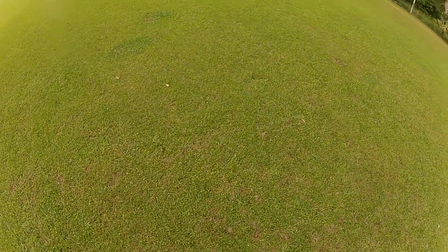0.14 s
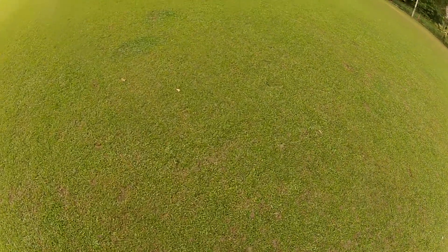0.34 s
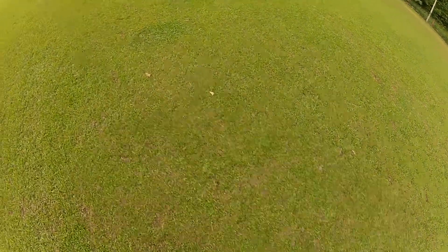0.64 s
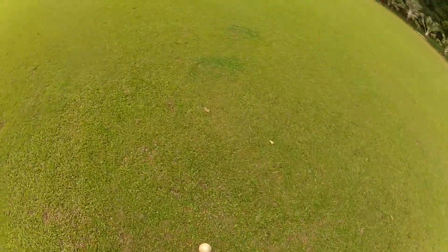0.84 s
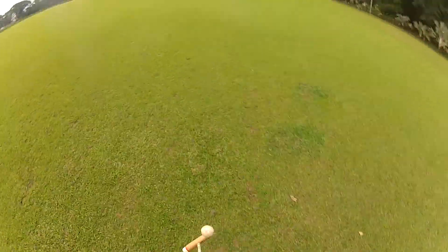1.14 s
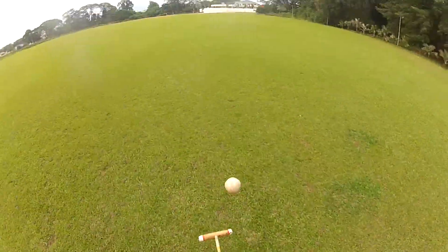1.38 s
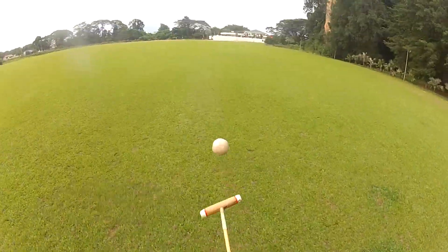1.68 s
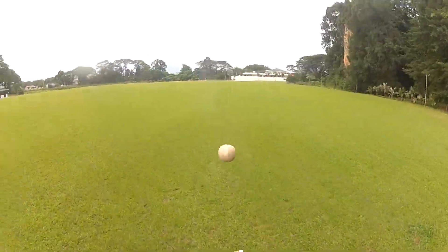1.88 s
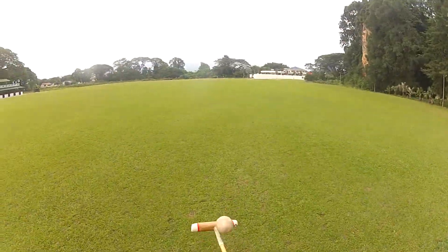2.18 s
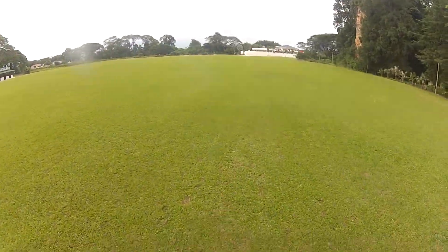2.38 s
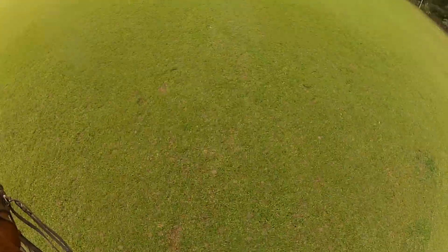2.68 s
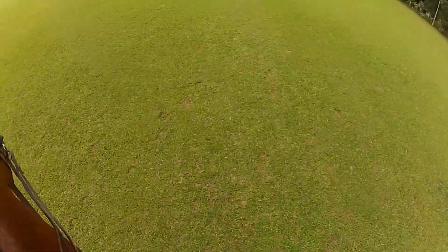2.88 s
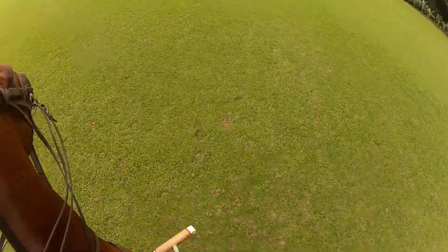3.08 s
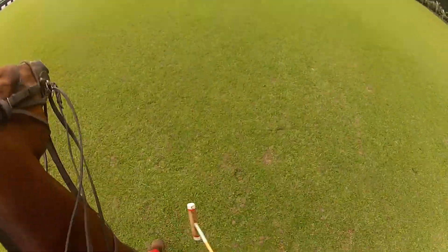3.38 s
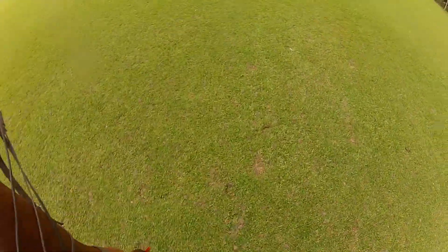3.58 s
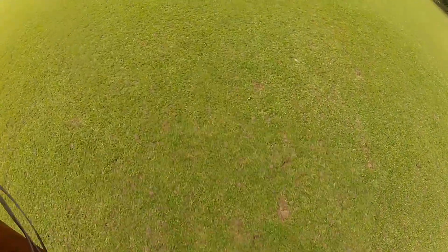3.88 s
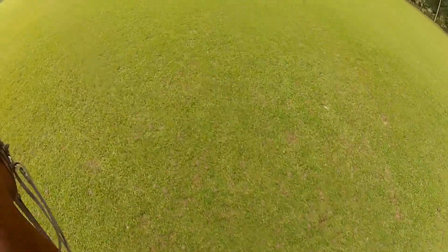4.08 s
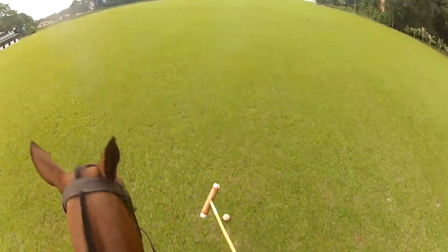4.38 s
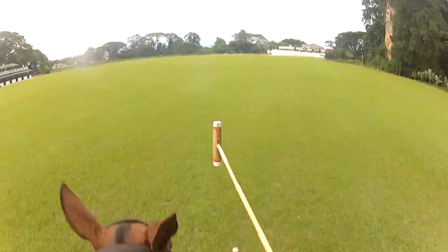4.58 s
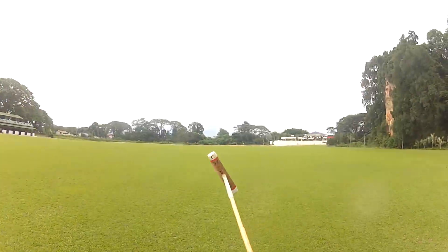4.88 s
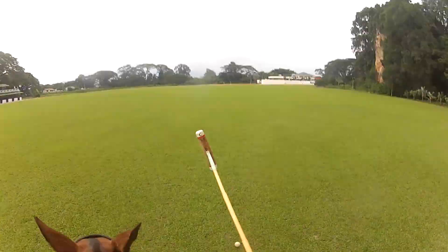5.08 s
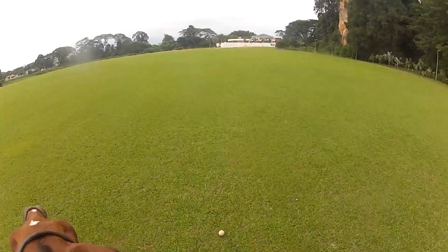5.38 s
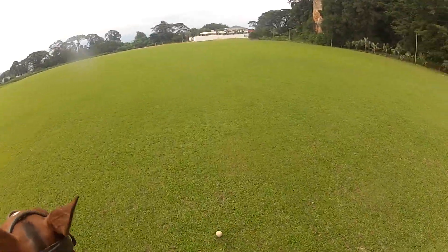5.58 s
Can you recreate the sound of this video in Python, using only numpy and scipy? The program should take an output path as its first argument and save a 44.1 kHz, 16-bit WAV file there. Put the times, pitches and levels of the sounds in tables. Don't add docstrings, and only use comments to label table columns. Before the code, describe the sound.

Mono sound from a sealed camera on a rider's helmet, on an open grass field with little reverberation. A low wind rumble and a faint, wavering far engine hum around 90 Hz lie underneath. Loud, dry mallet-on-ball cracks come at about 0.85, 1.2, 1.6, 2.2, 2.7 and 3.1 seconds; those at 1.2 and 3.1 are hardest, the one at 2.2 softer and duller. Each has a clipped click, short woody ring and quick return off the ground. Between them, straps creak, tick and slip in little rattling runs, the shell knocks hollowly, and hooves thud softly. Around 4.05 a weaker blow arrives amid crackling turf scrapes and bumps, followed by busy ticks and knocks until 4.6. A small clack comes at 5.3. From about 4.8 wind rises steadily into strong, deep buffeting at the end, about 5.7. The tone is muffled with a gritty, mirrored digital treble.

```python
import sys
import numpy as np
from scipy import signal
from scipy.fft import rfft, irfft, next_fast_len
from scipy.io import wavfile
from scipy.ndimage import map_coordinates

SR = 44100
rng = np.random.default_rng(int(sys.argv[2]) if len(sys.argv) > 2 else 0)


def nominal_scale(level):
    x = np.asarray(level, float) / 20
    return 10 ** x


def wav_record(signal):
    frames = np.transpose(np.atleast_2d(signal))
    bounded = np.clip(frames, -1, 1)
    quanta = np.round(bounded * 32767).astype(np.int16)
    wavfile.write(sys.argv[1], SR, quanta)


N = 253134

# (time [s], level [dB])
WIND_STRENGTH = [(0.0, -51), (0.14, -55.5), (0.7, -55), (1.01, -44.5), (1.12, -58), (1.32, -51.5),
                 (2.01, -43.5), (2.21, -40.5), (2.48, -53.5), (3.29, -47.5), (3.45, -56.5), (3.68, -55),
                 (3.97, -48), (4.36, -51.5), (4.87, -42), (5.07, -35), (5.45, -28), (5.74, -26.5)]
# (start [s], length [s], gap [ms], slip level [dB], pitch [Hz])
STRAP_RUNS = [(0.0, 0.064, 15, -43, 3150), (0.403, .09, 11.5, -41, 2660), (0.531, 0.066, 17, -57, 2280),
              (0.667, 0.068, 33, -43.5, 2400), (0.809, 0.05, 20, -39, 2930), (1.048, 0.035, 6.1, -40, 3340),
              (1.273, .13, 30, -54, 2380), (1.425, 0.21, 18.5, -40.5, 2130), (1.803, 0.14, 22, -47.5, 2800),
              (2.019, 0.07, 30, -51, 3500), (2.114, .07, 35, -40, 2800), (2.41, 0.174, 12, -39, 4660),
              (2.919, 0.11, 16, -50.5, 3100), (3.185, 0.057, 22, -64, 2600), (3.349, 0.14, 21, -49, 2270),
              (3.803, 0.066, 18, -48, 2170), (3.999, .045, 9.7, -36, 3820), (4.09, 0.034, 22, -40, 2610),
              (4.271, 0.055, 17, -41, 2740), (4.438, 0.32, 24, -41.5, 2800), (4.942, .11, 31, -50, 2300),
              (5.169, 0.085, 14.7, -40, 3370), (5.658, .08, 27, -54, 1920)]


def unit(x):
    return x / np.sqrt(np.mean(x ** 2) + 1e-20)


def along(points, hz):
    f, v = np.transpose(points)
    return np.interp(np.log(hz + 1), np.log(f + 1), v)


def curve(rows):
    s, value = np.transpose(rows)
    return np.interp(np.arange(N) / SR, s, value)


def wobble(rate):
    knots = rng.standard_normal(int(N * rate / SR) + 4)
    return map_coordinates(knots, [np.arange(N) * rate / SR])


def swell(start, end, edge):
    t = np.arange(N) / SR
    inside = np.clip(np.minimum(t - start, end - t) / edge + 1, 0, 1)
    return np.sin(np.pi / 2 * inside) ** 2


def filtered(x, response):
    n = x.shape[-1]
    m = next_fast_len(n + SR // 2)
    return irfft(rfft(x, m) * response(np.fft.rfftfreq(m, 1 / SR)), m)[..., :n]


def below(hz, corner_hz):
    return 1 / (1 + (hz / corner_hz) ** 4)


def grains(spectrum, rate, life_s, spread_db, air):
    sizes = (rng.random(N) < rate / SR) * nominal_scale(spread_db * rng.exponential(size=N))
    bursts = signal.lfilter([1], [1, -np.exp(-1 / (life_s * SR))], sizes)
    x = (air + unit(bursts)) * rng.standard_normal(N)
    return unit(filtered(x, lambda hz: nominal_scale(along(spectrum, hz))))


def add(x, s, db, hz, t60, rise):
    i = int(s * SR)
    t = np.clip(np.arange(i, min(N, i + SR // 8)) / SR - s, 0, None)
    envelope = nominal_scale(db - 60 * t / t60) * (1 - np.exp(-t / rise))
    x[i:i + len(t)] -= envelope * np.sin(2 * np.pi * hz * t)


def wind():
    # (frequency [Hz], level [dB per Hz])
    buffet_colour = [(12, -27.5), (20, -11.5), (96, 0), (131, 1.5), (169, -1.5), (270, -5), (576, -20),
                     (1030, -41.5), (1500, -50.5), (1950, -60.5), (3300, -120)]
    # (time [s], lift [dB], half length [s])
    jerks = [(0.426, 4, 0.066), (0.861, 12.5, 0.1), (1.31, 8.5, 0.075), (1.534, 13, 0.074),
             (1.867, 6.5, 0.07), (2.745, 13, 0.094), (3.11, 7, 0.086), (3.442, 13, 0.092),
             (3.704, 21.5, 0.022), (4.448, 9.5, 0.038), (2.12, 3, .08), (2.406, 2.5, 0.094),
             (4.894, 7, 0.048), (4.992, 6, 0.12), (5.36, 1.5, 0.043), (5.63, 1.5, 0.04)]
    # (time [s], lift [dB], half length [s])
    eddies = [(.29, 1, .1), (0.782, 5, 0.18), (1.173, 10, 0.089), (1.483, 7, 0.067), (1.842, 4.5, 0.16),
              (1.99, 5, 0.09), (2.279, 5, .08), (2.8, 8, .08), (3.06, 6, 0.083), (3.56, 9, 0.043),
              (3.934, 7, .12), (4.4, 5.5, 0.13), (4.74, 4, 0.12), (4.993, 9.5, 0.24)]
    gust_db = curve(WIND_STRENGTH) + 46
    jerk_db = sum(db * swell(s, s, half) for s, db, half in jerks)
    eddy_db = sum(db * swell(s, s, half) for s, db, half in eddies)
    noise = filtered(rng.standard_normal((2, N)), lambda hz: nominal_scale(along(buffet_colour, hz)))

    rumble = unit(filtered(noise[0], lambda hz: below(hz, 85)))
    deep = nominal_scale(-47.5 + 0.56 * gust_db + eddy_db) * rumble

    buffet = filtered(noise[1], lambda hz: 1 - below(hz, 95))
    flutter = nominal_scale(0.98 * wobble(13) + 0.67 * wobble(60))
    buffet = unit(flutter * buffet)
    lower = filtered(buffet, lambda hz: below(hz, 280))
    upper = nominal_scale(-1 + 0.214 * gust_db) * (buffet - lower)
    return deep + nominal_scale(-45.5 + gust_db + jerk_db) * (lower + upper)


def engine():
    # (time [s], level [dB])
    drone_level = [(0.0, -51), (0.21, -45), (1.13, -41), (1.36, -55), (2.03, -39.5), (2.46, -57.5),
                   (2.76, -53), (3.42, -68), (4.75, -43), (5.0, -40), (5.53, -39), (5.74, -60)]
    pitch_hz = 92 + 2.52 * wobble(6.5)
    level_db = curve(drone_level) + 1.5 * wobble(14)
    return nominal_scale(level_db - 3.5) * np.sin(2 * np.pi * np.cumsum(pitch_hz) / SR)


def creak():
    # (time [s], level [dB])
    strap_strain = [(0.0, -58.5), (0.35, -61), (0.64, -59), (1.52, -60.5), (1.61, -68.5), (1.85, -60.5),
                    (1.97, -64.5), (2.43, -64.5), (2.59, -59.5), (2.75, -57.5), (3.23, -59.5),
                    (3.55, -60.5), (4.16, -58), (4.33, -61), (4.89, -59.5), (5.08, -58.5), (5.42, -59),
                    (5.74, -60.5)]
    # (frequency [Hz], level [dB per Hz])
    shell_colour = [(100, -46), (220, -6), (320, 4), (550, 3), (720, -2), (950, -22), (1500, -35.5)]
    # (frequency [Hz], level [dB per Hz])
    rustle_colour = [(530, -1.5), (900, -6), (1510, -13), (1710, -11), (2510, -9.5), (2730, -10),
                     (4330, -14.5), (4920, -9), (6000, -18), (7800, -50), (13200, -120)]
    drag = sum(swell(s, s + length, 0.013) for s, length, *_ in STRAP_RUNS)
    strain_db = curve(strap_strain) + 60 + 4.5 * drag
    by_straps = nominal_scale(-48.5 + 0.94 * strain_db)
    by_wind = nominal_scale(curve(WIND_STRENGTH) - 12)
    shell = np.hypot(by_straps, by_wind) * nominal_scale(1.2 * wobble(30))
    shell *= grains(shell_colour, rate=220, life_s=.003, spread_db=2.5, air=.6)
    rustle = nominal_scale(-55.5 + strain_db + 2 * wobble(20))
    rustle *= grains(rustle_colour, rate=170, life_s=.001, spread_db=2.4, air=1.1)
    return shell + rustle


def slip_runs():
    uneven, scatter_db, pitch_spread = 0.11, 3.5, 0.25
    slowing = 0.027
    rows = []
    for start, length, gap_ms, db, hz in STRAP_RUNS:
        late, size, pitch = rng.standard_normal((3, 16))
        k = np.arange(len(late))
        times = start + gap_ms / 1000 * (k + slowing * k * k / 2 + uneven * np.abs(late))
        slips = zip(times, db + scatter_db * size, hz * np.exp(pitch_spread * pitch))
        rows += [slip for slip in slips if slip[0] < start + length]
    return rows


def strap_slips():
    # (time [s], peak level [dB], pitch [Hz])
    ticks = [(0.0565, -51, 2740), (0.148, -42, 2300), (0.5413, -34.5, 2240), (0.5813, -36, 2610),
             (0.7934, -45, 2690), (1.0106, -37, 2750), (1.3204, -41, 2240), (1.3862, -35.5, 2820),
             (1.6829, -36, 2080), (1.7045, -36, 2750), (1.8734, -35, 2300), (1.9285, -35.5, 3050),
             (2.5435, -34, 2640), (2.6569, -34, 2060), (2.7337, -37, 2100), (2.8733, -41, 1380),
             (2.9824, -27, 2670), (3.0024, -35, 3320), (3.1276, -35.5, 3350), (3.277, -30, 1700),
             (3.3727, -37, 2500), (3.689, -35, 2940), (3.9407, -33.5, 2720), (3.9863, -36, 2200),
             (4.1368, -33, 2670), (4.1796, -31.5, 2430), (4.2274, -30, 2810), (4.2977, -29.5, 2650),
             (4.9048, -39, 2700), (5.2045, -34.5, 2880)]
    # (time [s], peak level [dB], pitch [Hz])
    brush = [
        (4.0404, -35, 3000),
        (4.0530, -20, 5000),
        (4.0545, -24, 3600),
        (4.0614, -30, 2880),
        (4.0674, -34, 3100),
    ]
    # (frequency [Hz], level [dB per Hz])
    slip_colour = [(900, -0.5), (1600, -24), (2500, -2.5), (4000, -1), (5500, 6), (7000, -5.5)]
    rings, t = np.zeros(N), np.arange(SR // 50) / SR
    bursts = np.zeros((2, N + SR))
    for s, db, hz in [*ticks, *brush, *slip_runs()]:
        add(rings, s, db + 1.0, hz, .007, rise=0.00042)
        bright = np.clip((hz - 1400) / 2600, 0, 1)
        burst = nominal_scale(db - 60 * t / 0.011) * (1 - np.exp(-t / 0.00046))
        bursts[:, int(s * SR):][:, :len(t)] += np.sqrt([[1 - bright], [bright]]) * burst
    rings += bursts[0, :N] * 0

    def two_colours(hz):
        dull = below(hz, 3000)
        return nominal_scale(along(slip_colour, hz)) * [dull, 1 - dull]

    scrape = filtered(rng.standard_normal((2, N)), two_colours)
    return rings + bursts[0, :N] * unit(scrape[0]) + bursts[1, :N] * unit(scrape[1])


def thuds(rows, lift_db, t60, rise):
    x = np.zeros(N)
    for s, db, hz in rows:
        add(x, s, db + lift_db, hz, t60, rise)
    return filtered(x, lambda hz: below(hz, 1100))


def hooves():
    # (time [s], peak level [dB], pitch [Hz])
    falls = [(0.412, -29.5, 269), (0.544, -38, 335), (0.583, -29, 330), (1.273, -32, 344),
             (1.383, -34, 328), (1.425, -35, 312), (1.5, -30, 242), (1.682, -37, 358), (2.501, -30, 355),
             (3.409, -34.5, 363), (3.699, -28, 234), (3.816, -37.5, 231), (4.134, -36.5, 369),
             (4.16, -31, 316), (4.178, -38, 250), (4.296, -38, 390), (4.592, -34.5, 372)]
    return thuds(falls, 9.5, t60=0.036, rise=0.0029)


def shell_knocks():
    # (time [s], peak level [dB], pitch [Hz])
    knocks = [(0.468, -26, 554), (0.487, -23.5, 583), (0.714, -34, 670), (0.803, -34, 605),
              (0.955, -29, 597), (1.449, -34.5, 624), (1.544, -27.5, 480), (1.569, -25, 514),
              (1.593, -25.5, 655), (1.682, -26.5, 460), (1.705, -33, 610), (1.93, -28, 503),
              (2.58, -31.5, 625), (2.916, -41, 527), (3.158, -23, 590), (3.28, -33, 600),
              (3.984, -26.5, 526), (4.096, -30, 543), (4.114, -36, 600), (4.137, -26.5, 595),
              (4.179, -25.5, 500), (4.229, -25.5, 593), (4.269, -32.5, 520), (4.553, -36, 670),
              (4.0315, -29, 520),
        (4.0420, -28.5, 520),
        (4.0640, -29, 540),
        (4.0710, -31, 520),
    ]
    return thuds(knocks, 9.0, t60=0.019, rise=0.0018)


def mallet():
    # (time [s], click level [dB], click pitch [Hz], click t60 [ms])
    taps = [
        (.8547, 9.7, 2100, 2.4),
        (1.1692, 13.5, 2030, 3.5),
        (1.6091, 11, 1920, 2.5),
        (2.2093, 7, 1530, 2.9),
        (2.6993, 9.5, 1570, 2.4),
        (3.0826, 13, 1960, 3.4),
        (4.0522, -7, 2200, 4),
    ]
    # (delay [ms], loss [dB])
    echoes = [(1.8, -5), (1.9, -7), (5.4, -14), (7.9, -22), (6.2, -14), (4.8, -19), (1.1, -2)]
    # (level [dB], pitch [Hz], t60 [ms])
    heads = [(-13, 500, 22), (-4, 550, 8), (-13, 600, 18), (-6, 600, 21), (-3, 545, 27), (-6, 530, 45),
             (-11, 500, 40)]
    # (level [dB], pitch [Hz], t60 [ms])
    balls = [(5, 3350, 3), (10, 3600, 3), (7, 3250, 3.5), (-4, 3080, 15), (2, 3020, 9), (10, 2850, 5),
             (-9, 2910, 15)]
    # (time [s], peak level [dB], pitch [Hz])
    clacks = [(4.0506, -17.5, 1020), (4.0548, -15.5, 2030), (4.0563, -27, 2500), (5.317, -28, 1260),
              (5.3178, -40, 2120)]
    # (frequency [Hz], level [dB per Hz])
    grass = [(300, -34.5), (700, 8.5), (2000, -6.5), (3200, -1.5), (4200, -22), (5200, 1.5), (6500, -42)]
    x, scatter, t = np.zeros(N), np.zeros(N), np.arange(SR // 8) / SR
    for (s, db, hz, ms), (echo_ms, echo_db), head, ball in zip(taps, echoes, heads, balls):
        for start, loss_db in (s, 0), (s + echo_ms / 1000, echo_db):
            add(x, start, db + loss_db, hz, ms / 1000, rise=.0002)
            add(x, start + .0006, head[0] + loss_db, head[1], head[2] / 1000, rise=.0006)
            add(x, start, ball[0] + loss_db, ball[1], ball[2] / 1000, rise=.0003)
        near = nominal_scale(db / 2 - 31 - 60 * t / .035)
        far = nominal_scale(db / 2 - 59 - 60 * t / .15)
        scatter[int(s * SR):][:len(t)] += near + far
    for s, db, hz in clacks:
        add(x, s, db + 7, hz, .006, rise=0.00029)
    contact = np.sin(np.pi * np.arange(1, 15) / 15)
    x = np.convolve(x, contact / contact.sum())[:N]
    x = filtered(x, lambda hz: 1j * hz / (170 + 1j * hz))
    return x + scatter * grains(grass, rate=900, life_s=.001, spread_db=1.5, air=2.5)


def scene():
    helmet = creak() + strap_slips() + shell_knocks()
    return (wind() + engine() + helmet + hooves() + mallet())[None]


def roll_off(x):
    return signal.sosfilt(signal.butter(12, 16540, fs=SR, output="sos"), x)


def record(dry):
    # (frequency [Hz], level [dB])
    housing = [(20, -2.5), (60, 3), (4000, 0), (5200, -6), (5600, -10), (6000, -8.5), (7000, -56)]
    x = np.pad(dry[0], (0, 1470), "reflect")
    x = filtered(x, lambda hz: nominal_scale(along(housing, hz)))
    x = signal.resample_poly(x, 40, 147)
    x = np.clip(x, -.9, .7)
    x = signal.resample_poly(np.repeat(x, 4), 147, 160)
    x = filtered(x, lambda hz: nominal_scale(-28 * (hz > 15400) - 80 * (hz > 16600)))
    return roll_off(x[None, :N])


dry = scene()
out = record(dry)
wav_record(out)
```